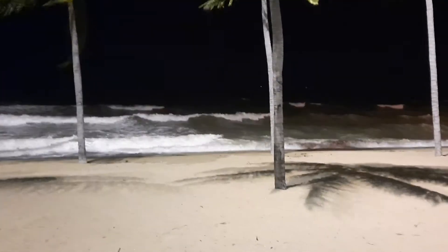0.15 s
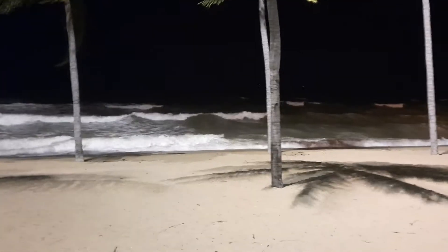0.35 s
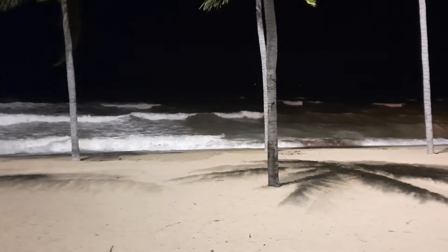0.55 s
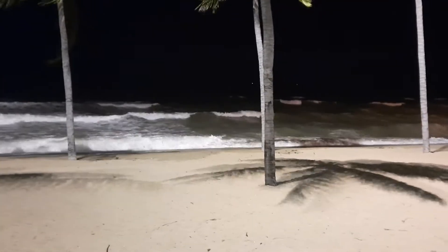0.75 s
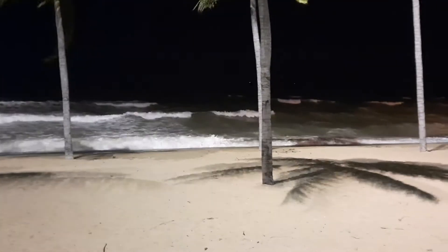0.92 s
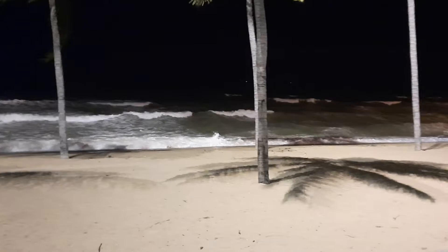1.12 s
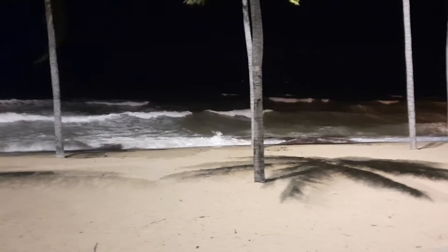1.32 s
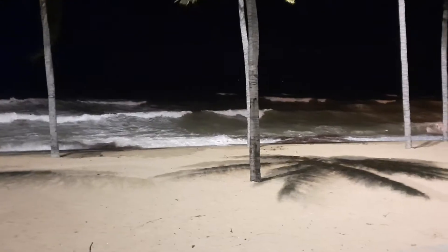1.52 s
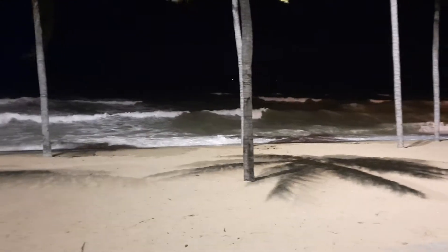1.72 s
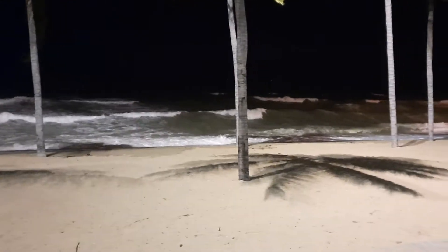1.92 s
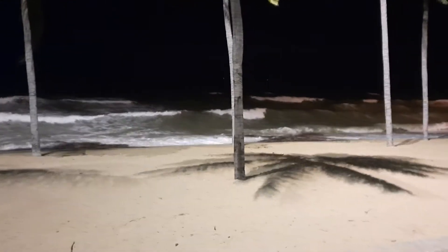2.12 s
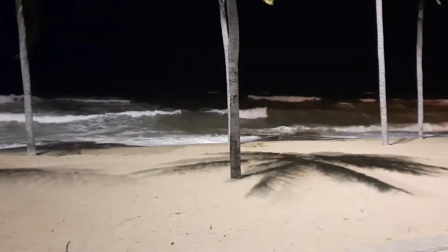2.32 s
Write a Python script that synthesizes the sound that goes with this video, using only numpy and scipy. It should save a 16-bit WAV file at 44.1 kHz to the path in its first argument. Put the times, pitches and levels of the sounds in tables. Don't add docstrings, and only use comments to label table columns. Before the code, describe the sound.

Wind buffeting dominates, close and rough: irregular low-mid knocks, crackling and lumpy rumble differing between left and right. Distant breaking waves hiss steadily all around an open sandy shore, clearer as the wind drops at the end.

```python
import sys
import numpy as np
from scipy import signal
from scipy.fft import rfft, irfft
from scipy.io import wavfile
from scipy.ndimage import uniform_filter1d, map_coordinates

SR = 44100
rng = np.random.default_rng(int(sys.argv[2]) if len(sys.argv) > 2 else 0)


def field_ratio(decibels):
    return 10 ** (np.asarray(decibels, dtype=float) / 20)


def digitize_waveform(pressure):
    field = np.atleast_2d(pressure).T
    bounded = np.clip(field, -1, 1)
    quanta = np.round(bounded * 32767).astype(np.int16)
    wavfile.write(sys.argv[1], SR, quanta)


N = 103635
T = np.arange(N) / SR

# (time [s], level [dB])
GUST = [(0.0, -33), (0.2, -39), (0.37, -25.5), (0.51, -40), (0.73, -33.5), (0.85, -33), (0.93, -24),
        (1.09, -31), (1.2, -32.5), (1.64, -36), (1.77, -27.5), (1.94, -32.5), (2.25, -39), (2.35, -52)]


def rms_one(x):
    return x / np.sqrt(np.mean(x ** 2) + 1e-20)


def in_time(rows):
    return np.interp(T, *np.transpose(rows))


def drift(hz):
    pole = np.exp(-40 * np.pi * hz / SR)
    noise = rng.standard_normal(N // 20 + 2002)
    slow = signal.lfilter([1], [1, -2 * pole, pole * pole], noise)[2000:]
    return np.interp(np.arange(N) / 20, np.arange(len(slow)), rms_one(slow - slow.mean()))


def coloured(spectrum, band=None):
    hz = np.maximum(np.fft.rfftfreq(N, 1 / SR), 1)
    at, db = np.transpose(spectrum)
    gain = field_ratio(np.interp(np.log(hz), np.log(at), db, left=-90, right=-90))
    gain = gain / np.sqrt(np.mean(gain ** 2))
    if band:
        gain = gain * np.cos(np.pi / 2 * np.clip(np.log2(hz / band) * 2, -1, 1))
    return irfft(rfft(rng.standard_normal(N)) * gain, N)


def evened(x, span_s):
    span = int(span_s * SR)
    power = uniform_filter1d(uniform_filter1d(x ** 2, span), span)
    return x / np.sqrt(power + 0.027)


def puff(start_s, length_s, attack_s):
    length_s = max(length_s, .006)
    half = length_s * .5
    after = np.maximum(T - start_s - half, 0) / half
    rise = np.clip((T - start_s) / attack_s + .5, 0, 1) ** 2
    return rise * np.exp(-after ** 2)


def surf():
    # (time [s], level [dB])
    swell_rows = [(0.0, -41), (0.01, -45.5), (0.18, -48.5), (0.23, -44.5), (0.63, -47.5), (0.92, -45.5),
                  (0.93, -49.5), (1.11, -45), (1.25, -50.5), (1.26, -45.5), (1.41, -48), (1.77, -48),
                  (1.83, -49.5), (1.91, -45), (1.92, -49), (2.2, -48.5), (2.3, -46.5), (2.35, -45)]
    # (frequency [Hz], level [dB per Hz])
    wash_colour = [(120, -20), (250, 12), (500, 2), (1000, 4), (1900, 5.5), (2400, 3), (3000, -10),
                   (3600, -86)]
    foam_colour = [(2200, -10), (3000, -6), (6070, -6.5), (7110, -10), (8630, -10.5), (9710, -16),
                   (13200, -10), (16500, -17.5)]
    swell = in_time(swell_rows)
    splash_db = .9 * drift(16)
    wash_gain = field_ratio(-43.5 - swell.mean())
    out = 0
    for hz in 200 * 2 ** np.arange(0, 7, .5):
        ears = [wash_gain * coloured(wash_colour, hz) + coloured(foam_colour, hz) for ear in range(2)]
        out = out + np.array(ears) * field_ratio(.85 * drift(20))
    return out * field_ratio(swell + splash_db)


def rumble():
    # (frequency [Hz], level [dB per Hz])
    rumble_colour = [(20, -44), (45, -9), (80, -3.5), (130, -5), (190, -9), (260, -25)]
    # (time [s], peak level [dB], left minus right [dB], length [s])
    surges = [(0.009, -25, -9, 0.018), (0.189, -27.5, -4, 0.057), (0.24, -24, -1, 0.036),
              (0.296, -26, -1, 0.067), (0.346, -25.5, 1, 0.056), (0.433, -19, -4, 0.028),
              (0.484, -29.5, 16.5, 0.048), (0.55, -30, -1, 0.035), (0.607, -33, -4, 0.041),
              (0.676, -37, -24.5, 0.045), (0.709, -32, 15, 0.037), (0.777, -25.5, -3.5, 0.065),
              (0.894, -23.5, 7.5, 0.048), (0.904, -27, 2, 0.076), (1.001, -23.5, 12.5, 0.033),
              (1.053, -27.5, -22, 0.022), (1.092, -24.5, -1, 0.082), (1.2, -27, 0, 0.03),
              (1.234, -19, 2, 0.043), (1.335, -26.5, -3, 0.075), (1.437, -29.5, 6, 0.071),
              (1.512, -24, -5, 0.027), (1.546, -23, 1.5, 0.057), (1.639, -24.5, -2, 0.029),
              (1.693, -23.5, 4, 0.039), (1.75, -27.5, -8, 0.069), (1.825, -24.5, -5, 0.074),
              (1.913, -26, 2, 0.097), (2.007, -28.5, 12.5, 0.096), (2.153, -29, 2, 0.043),
              (2.233, -32, -6.5, 0.08)]
    lump_hz, ear_share = 4.7, 0.64
    gust, shared = in_time(GUST), drift(lump_hz)
    own = np.sqrt(1 - ear_share ** 2)
    lumps = np.array([ear_share * shared + own * drift(lump_hz) for ear in range(2)])
    power = field_ratio(-47 + 0.12 * (gust - gust.mean()) + 7.0 * np.tanh(lumps)) ** 2
    for start_s, db, pan_db, length_s in surges:
        ears_db = db - 5 + pan_db * np.array([[.5], [-.5]])
        power = power + (field_ratio(ears_db) * puff(start_s, length_s, .015)) ** 2
    return np.sqrt(power) * np.array([evened(coloured(rumble_colour), 0.048) for ear in range(2)])


def airflow():
    # (time [s], peak level [dB], rasp relative to thump [dB], length [s])
    eddies = [(0.064, -85, -32, 0.0089), (0.142, -23.5, -37, 0.057), (0.19, -14, -13, 0.081),
              (0.265, -16, -26, 0.043), (0.303, -15, -25, 0.023), (0.322, -9.5, -49, 0.015),
              (0.37, -25, -36, 0.039), (0.408, -16, -35, 0.03), (0.43, -12, -13, 0.059),
              (0.493, -9.5, -13.5, 0.015), (0.55, -18.5, -16, 0.029), (0.651, -27.5, -25, 0.051),
              (0.703, -20, -58, 0.11), (0.775, -15.5, -18.5, 0.059), (0.821, -20.5, -17, 0.03),
              (0.895, -14, -16.5, 0.081), (0.957, -9.5, -10, 0.026), (0.987, -10, -16, 0.047),
              (1.062, -13.5, -50, 0.018), (1.099, -22, -22, 0.026), (1.185, -12, -15, 0.027),
              (1.204, -7.5, -20, 0.056), (1.359, -18.5, -19, 0.023), (1.378, -15.5, -8, 0.048),
              (1.433, -8.5, -9, 0.034), (1.471, -18.5, -29, 0.068), (1.53, -15, -22, 0.055),
              (1.59, -21.5, -28, 0.05), (1.642, -15.5, -40, 0.0099), (1.692, -20, -38, 0.051),
              (1.758, -14.5, -22, 0.048), (1.833, -20.5, -28, 0.015), (1.94, -29, -4, 0.014),
              (2, -20.5, -12, 0.066), (2.067, -36, -24, 0.02), (2.172, -30, -12, 0.013),
              (2.038, -33, 8, 0.015), (2.27, -28, -4.5, 0.028)]
    thump = field_ratio(in_time(GUST) + 1.5 * drift(33.4)) ** 2
    rasp = thump * field_ratio(-12) ** 2
    for start_s, db, rasp_db, length_s in eddies:
        power = (field_ratio(db - 9) * puff(start_s, length_s, attack_s=0.0071)) ** 2
        thump = thump + power
        rasp = rasp + power * field_ratio(rasp_db + 5.5) ** 2
    return thump, rasp


def buffet(thump, rasp):
    # (frequency [Hz], level [dB per Hz])
    hollow_colour = [(150, -6.5), (230, -8), (300, 4.5), (350, -2.5), (480, -3), (700, -17.5), (1000, -25)]
    rim_colour = [(400, -2.5), (750, 10.5), (1000, -1.5), (1800, -13), (2600, -31), (4500, -29)]
    spikes_db = 3.5 * drift(133)
    hollow = np.sqrt(thump) * field_ratio(.6 * spikes_db) * evened(coloured(hollow_colour), 0.0037)
    rim = np.sqrt(rasp) * field_ratio(spikes_db) * evened(coloured(rim_colour), 0.0058)
    return hollow + rim


def scattered(x):
    rate_hz, width_hz, wander = 60, 500, .35
    hz, s, z = signal.stft(x, SR, nperseg=256, noverlap=224)
    coarse = rng.standard_normal((int(SR / 2 / width_hz) + 2, int(N / SR * rate_hz) + 2))
    grid = np.meshgrid(hz / width_hz, s * rate_hz, indexing="ij")
    wandering = wander * map_coordinates(coarse, grid, order=3, mode="nearest")
    turn = np.exp(1j * np.pi * (1 / 4 + wandering))
    ears = (turn, turn.conj())
    return np.array([signal.istft(z * t, SR, nperseg=256, noverlap=224)[1][:N] for t in ears])


def pops(thump):
    hollow_hz, t60_s, edge_hz = 347, .022, 800
    sizes = field_ratio(-5.5 + 4.5 * np.minimum(rng.exponential(1, (2, N)), 2)) * rng.choice([-1, 1], (2, N))
    clicks = np.sqrt(thump) * sizes * (rng.random((2, N)) < 110 / SR)
    r, w = field_ratio(-60 / (t60_s * SR)), 2 * np.pi * hollow_hz / SR
    hollow = signal.lfilter([0, np.sin(w)], [1, -2 * r * np.cos(w), r * r], clicks + 1e-18)
    edge_filter = signal.butter(2, edge_hz, fs=SR, output="sos")
    edge = signal.sosfilt(edge_filter, clicks) * SR / (3 * edge_hz)
    soften = signal.butter(4, 1150, fs=SR, output="sos")
    return signal.sosfilt(soften, hollow + field_ratio(-3) * edge)


def knocks(table, sway):
    hollow_hz, pitch_spread, rise_s, fall_s, tick_s = 343.7, 0.15, 0.0015, 0.0041, .0022
    tick_band = signal.butter(2, [700, 1900], "band", fs=SR, output="sos")
    air = rms_one(signal.sosfilt(tick_band, rng.standard_normal(N)))
    out = np.zeros(N)
    for (start_s, db, tick_db), pitch in zip(table, rng.uniform(-1.2, 1, len(table))):
        t = T - start_s
        shape = np.exp(-(np.minimum(t, 0) / rise_s) ** 2 - np.maximum(t, 0) / fall_s)
        hz = hollow_hz * (1 + pitch_spread * pitch)
        swing = np.cos(2 * np.pi * hz * t + sway[int(start_s * SR)])
        tick = field_ratio(tick_db + 1) * air * np.exp(-(t / tick_s) ** 2)
        out += field_ratio(db - 2.5) * (shape * swing + tick)
    knock_band = signal.butter(2, [170, 2900], "band", fs=SR, output="sos")
    return signal.sosfiltfilt(knock_band, out)


def scene():
    # (time [s], peak level [dB], tick relative to pop [dB])
    left_pops = [(0.0085, -17.5, -16.5), (0.1617, -18, -24), (0.258, -8, -32), (0.2708, -6, -28),
                 (0.3289, 1.5, -29), (0.4427, -9.5, -27), (0.4564, -6, -33), (0.4639, -15, -20),
                 (0.5073, -10, -39), (0.7065, -18, -15), (0.7726, -13.0, -40), (0.7898, -13.5, -30),
                 (0.8017, -8.5, -19.5), (0.8684, -16.5, -14.5), (0.9156, -14, -47), (0.9273, -16, -21),
                 (0.9621, -5, -29), (0.9734, -6, -26), (1.0003, -7, -26), (1.0093, 0, -28),
                 (1.0275, -9, -22), (1.0734, -18.5, -18), (1.1027, -10, -22), (1.1169, -14, -21.0),
                 (1.1987, -5, -25.5), (1.2184, -5.5, -35), (1.232, -1.5, -42), (1.2409, -3, -33),
                 (1.2515, -8.5, -24), (1.2978, -16, -27), (1.3565, -19.0, -22), (1.3629, -14, -21),
                 (1.3843, -27, -19), (1.3913, -8, -39), (1.4014, -17, -33), (1.4342, 4.5, -40),
                 (1.443, -9, -17), (1.5078, -11.5, -21.0), (1.644, -10.5, -25), (1.7705, -6, -35),
                 (1.8417, -21, -14), (1.8784, -28, -7), (1.9392, -18.0, -21), (2.022, -11, -18),
                 (2.1698, -16.5, -25), (2.2356, -22.5, -8)]
    right_pops = [(0.0676, -18, -24), (0.1486, -18, -14.5), (0.2047, -23, -21), (0.2214, -12, -25.5),
                  (0.3286, -2.5, -30.5), (0.4429, -9.5, -20), (0.4634, -7, -23.5), (0.5013, -7.5, -42),
                  (0.5517, -19, -24), (0.7525, -22, -25), (0.7881, -17, -37), (0.8599, -23, -7),
                  (0.9191, -5.5, -32), (0.9298, -16, -24.5), (0.9644, -0.5, -24), (0.9963, -1, -27),
                  (1.0061, -4, -20.5), (1.0146, -10, -26), (1.0694, -17, -26), (1.1316, -15, -23),
                  (1.2009, -6.5, -20), (1.2168, -5.5, -31), (1.2325, -9, -38), (1.2402, -25, -18),
                  (1.3919, -12, -43), (1.3997, -6.5, -34), (1.436, 3, -37), (1.4429, -13, -32),
                  (1.4522, -6, -16.5), (1.5393, -9.5, -25), (1.551, -17, -38), (1.5785, -12.5, -25),
                  (1.6432, -10, -30), (1.7418, -11.5, -31), (1.7715, -8, -29), (1.8751, -22.5, -12),
                  (1.9239, -19, -30), (1.9338, -21.5, -10), (2.0083, -18.5, -10), (2.0239, -13, -16.5),
                  (2.0305, -14.5, -8), (2.0878, -30, -19.0), (2.1692, -15.5, -22), (2.2339, -28, -2),
                  (2.2405, -21.5, -11.5), (2.2989, -18.5, -19.5)]
    thump, rasp = airflow()
    wind = scattered(buffet(thump, rasp)) + pops(thump)
    wind_filter = signal.butter(4, 240, "high", fs=SR, output="sos")
    around = surf() + rumble() + signal.sosfilt(wind_filter, wind)
    sway = 2 * np.pi * (340 * T + .5 * drift(12))
    return around + np.array([knocks(left_pops, sway), knocks(right_pops, sway + np.pi / 2)])


def low_pass(x):
    return signal.sosfilt(signal.butter(12, 15780, fs=SR, output="sos"), x)


def record(dry):
    mix = dry / (1 + np.abs(dry / .97) ** 4) ** (1 / 4)
    return low_pass(mix)


dry = scene()
out = record(dry)
digitize_waveform(out)
```